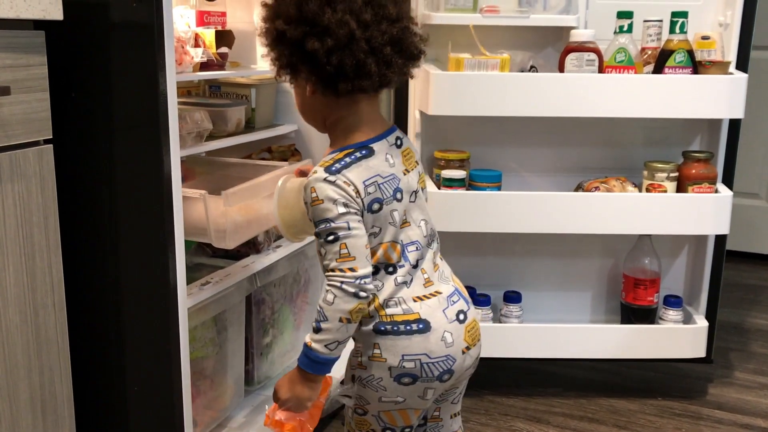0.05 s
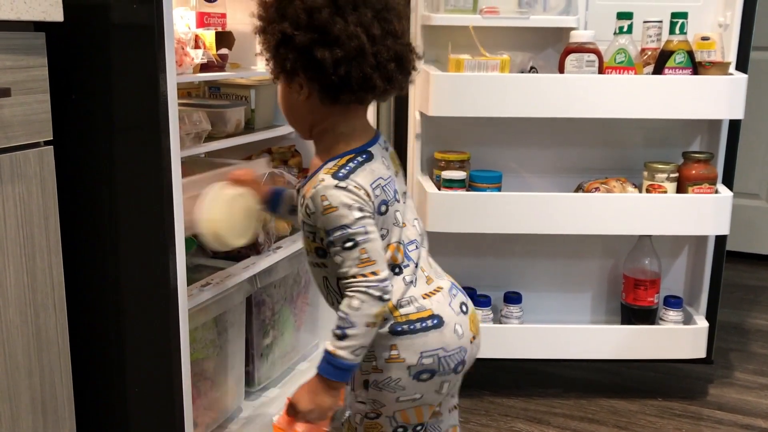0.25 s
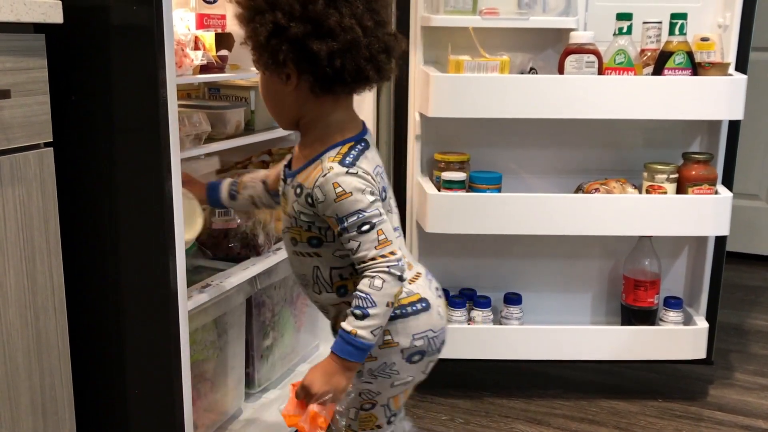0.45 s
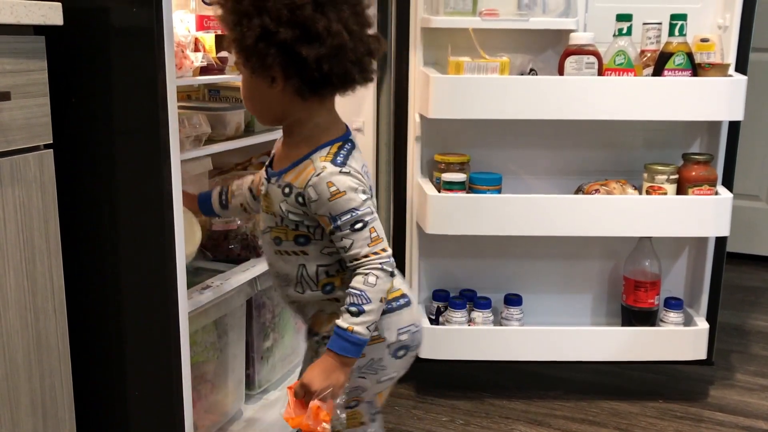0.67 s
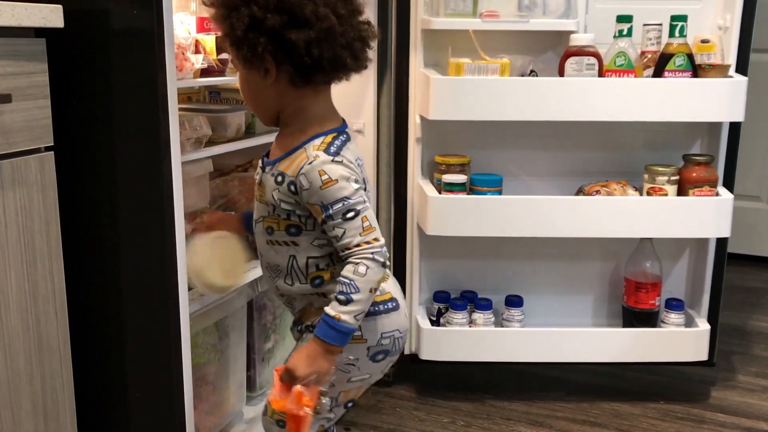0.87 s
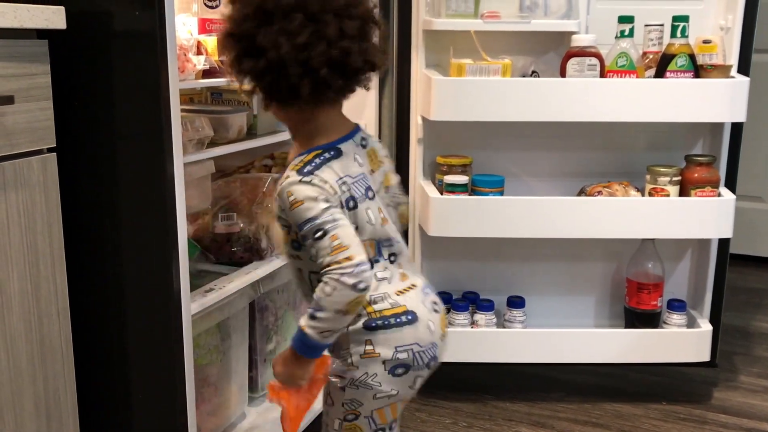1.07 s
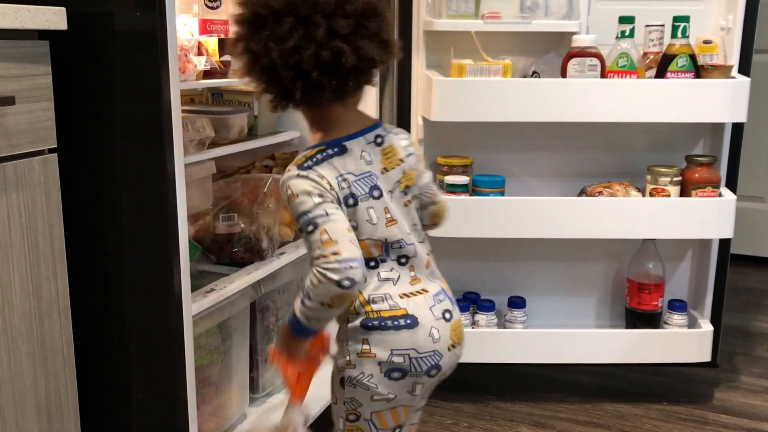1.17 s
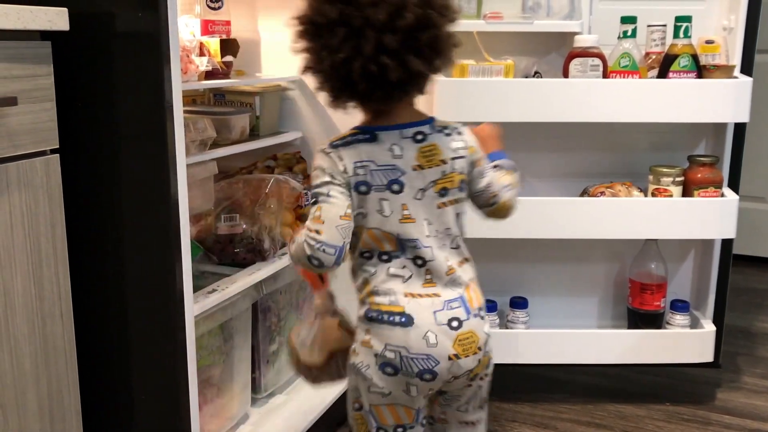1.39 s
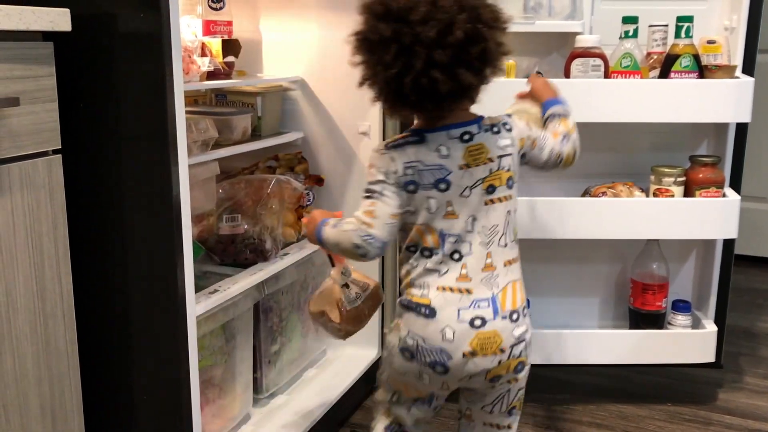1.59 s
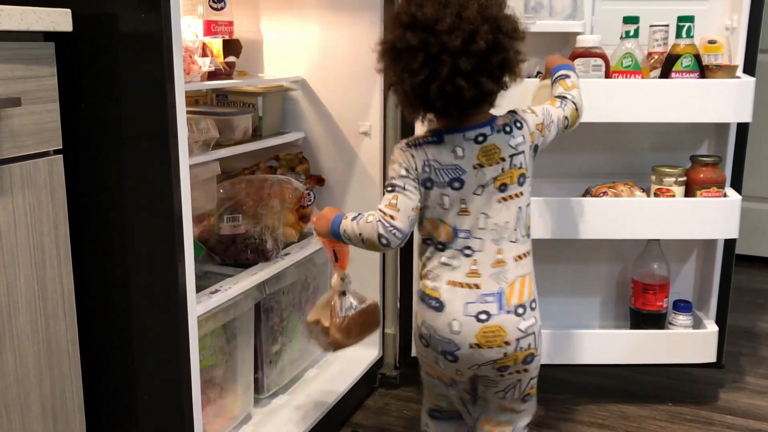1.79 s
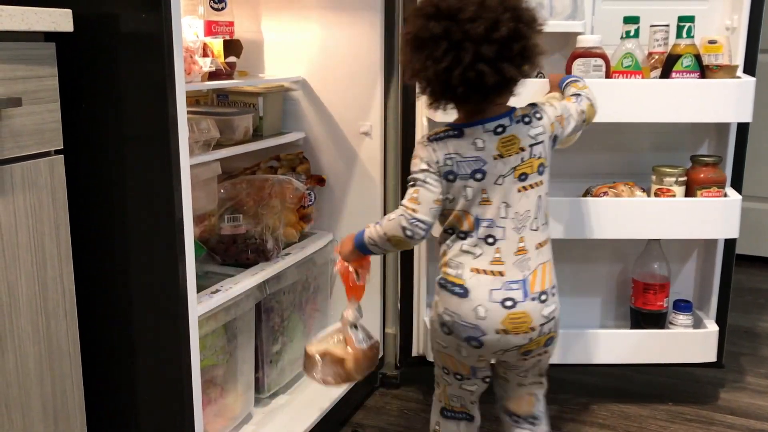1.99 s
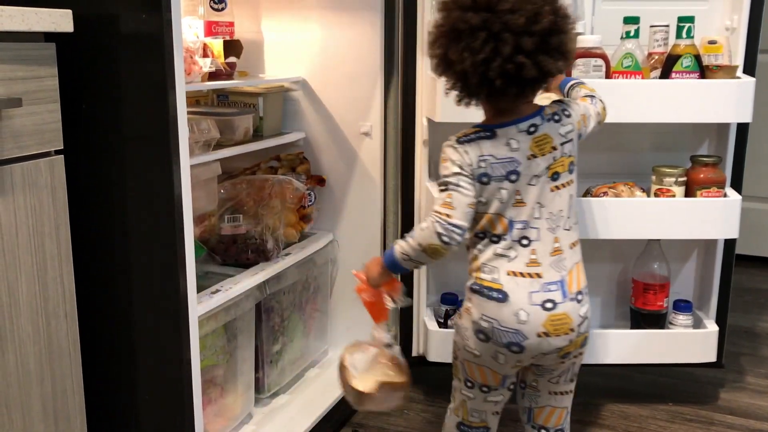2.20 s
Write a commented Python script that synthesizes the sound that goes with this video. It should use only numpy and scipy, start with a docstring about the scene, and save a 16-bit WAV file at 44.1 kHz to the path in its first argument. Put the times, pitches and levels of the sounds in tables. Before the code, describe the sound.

A food container clatters into a plastic fridge drawer, rolls bumpily and thuds at the end; then faint bag crinkles and tiny clinks, and a light knock on the door shelf, heard close in a kitchen.

```python
"""A round food container drops into a plastic refrigerator drawer, rolls along it and thuds to a stop.
Blows ring modes and decaying noise; rolling is a patter of short pings, brushing wrap a run of clicks.
Jars, bottles and packets clink as sines; a thin bag crinkles in pings and noise snaps, with a high hiss.
Then something knocks on a door shelf. The refrigerator hums in faint air noise; the kitchen reverberates."""
import sys
import numpy as np
from scipy import signal
from scipy.fft import rfft, irfft
from scipy.io import wavfile

SR = 44100
rng = np.random.default_rng(int(sys.argv[2]) if len(sys.argv) > 2 else 0)


def digitize_waveform(pressure):
    """Quantize a signal to 16-bit integers and store it at the path in sys.argv[1].

    Rows of a 2-D input are taken as channels; values are limited to [-1, 1].
    """
    field = np.atleast_2d(pressure).T
    bounded = np.clip(field, -1, 1)
    quanta = np.round(bounded * 32767).astype(np.int16)
    wavfile.write(sys.argv[1], SR, quanta)


N = 99225  # samples


def amp(db):
    """Converts decibels to gain."""
    return 10 ** (np.asarray(db) / 20)


def unit(x):
    """Scales to an rms of one."""
    return x / np.sqrt(np.mean(x ** 2) + 1e-20)


def read(points, hz):
    """Interpolates a table on a log-frequency axis."""
    f, value = np.transpose(points)
    return np.interp(np.log(hz + 1), np.log(f + 1), value)


def level(points):
    """Gain over time from a table of seconds and dB."""
    return amp(np.interp(np.arange(N) / SR, *np.transpose(points)))


def freqs(size):
    """Bin frequencies of a spectrum in Hz."""
    return np.fft.rfftfreq(size, 1 / SR)


def colour(x, points):
    """Filters a signal by a dB curve, to an rms of one."""
    gain = amp(read(points, freqs(len(x))))
    return unit(irfft(rfft(x) * gain, len(x)))


def add(mix, s, sound):
    """Mixes a sound in at s seconds."""
    part = mix[max(round(s * SR), 0):][:len(sound)]
    part += sound[:len(part)]


def taps(size, order=12):
    """One impulse of random sign at a random place in every short step."""
    out = np.zeros(size)
    at = np.arange(0, size - order, order)
    out[at + rng.integers(0, order, len(at))] = rng.choice([-1., 1.], len(at))
    return out


def die_away(x, t60s, count=11):
    """Splits a signal into overlapping bands, each decaying at its own speed."""
    t, hz, centres = np.arange(len(x)) / SR, freqs(len(x)), np.geomspace(70, 15000, count)
    z = rfft(x)
    out = np.zeros(len(x))
    for centre_hz, weights in zip(centres, np.eye(count)):
        band = irfft(z * read(np.c_[centres, weights], hz), len(x))
        out += band * amp(-60 * t / read(t60s, centre_hz))
    return out


def ring(modes, size=32768):
    """Exponentially decaying sines of a struck object, alternating in sign."""
    t = np.arange(size) / SR
    out = np.zeros(size)
    for k, (hz, db, t60) in enumerate(modes):
        decay = np.exp(-np.log(1000) * t / t60)
        out += (-1) ** k * amp(db) * decay * np.sin(2 * np.pi * hz * t)
    return out


def grains(per_s, spread_db):
    """Clicks at random times and of random sign, a few of them large."""
    hits = rng.random(N) < per_s / SR
    sizes = amp(spread_db * np.minimum(rng.exponential(1, N), 4))
    return hits * rng.choice([-1., 1.], N) * sizes


def patter(per_s, spread_db, cycles, range_hz, count=28, size=4096):
    """Many tiny contacts, each a ping at one of count pitches, falling to 1/e in the given cycles."""
    out, t = np.zeros(N), np.arange(size) / SR
    for hz in np.geomspace(*range_hz, count):
        ping = hz * np.exp(-hz * t / cycles) * np.sin(2 * np.pi * hz * t)
        out += signal.oaconvolve(grains(per_s / count, spread_db), ping)[:N]
    return out


# Decay of plastic panels. Each row: frequency in Hz, t60 in s.
PANEL_T60 = [(100, 0.2), (400, 0.14), (1200, 0.15), (4000, 0.17), (14000, 0.063)]
BASS_HZ, TREBLE_HZ = 300, 4400  # corners of the tilt shelves
MODE_SCATTER = 0.016  # relative pitch change from one contact point to the next


def blows(rows, spectrum, modes, size=32768):
    """Each blow sets off an object's main modes and the dense clatter of its panels."""
    out, t, hz = np.zeros(N), np.arange(size) / SR, freqs(size)
    bass = 1 / (1 + (hz / BASS_HZ) ** 2)
    treble = hz ** 2 / (hz ** 2 + TREBLE_HZ ** 2)
    for s, db, bass_db, treble_db, rise_s, modes_db in rows:
        tilt = amp(bass_db * bass + treble_db * treble)
        clatter = die_away(irfft(rfft(colour(taps(size), spectrum)) * tilt), PANEL_T60)
        struck = [(f * (1 + MODE_SCATTER * rng.uniform(-0.98, 1)), mode_db, t60) for f, mode_db, t60 in modes]
        onset = np.minimum(t / rise_s, 1)
        add(out, s, onset * (amp(db) * clatter + amp(modes_db) * ring(struck)))
    return out


# Hum lines. Each row: frequency in Hz, level in dB before BACKGROUND, unsteadiness 0-1.
HUM = [(173, -56, 0.23), (251, -64, 0.55), (356, -71.5, 0.24)]
# Spectrum of the air noise. Each row: frequency in Hz, relative level in dB per Hz.
AIR_COLOUR = [(25, -34), (55, -17), (100, -0.5), (200, 5.5), (400, -5.5), (700, -9.5), (1300, -10.5),
              (2000, -18), (4200, -21), (7000, -33), (10000, -38), (16000, -66)]
# Gain on hum and air. Each row: time in s, gain in dB.
BACKGROUND = [(0, -6), (.9, 4.5), (1.3, 2.5), (1.7, 1.5)]
HUM_WAVER_HZ, AIR_DB = 7, -57  # AIR_DB before BACKGROUND


def refrigerator():
    """Hum lines, wavering by slow noise in two quadratures, in soft air noise."""
    t = np.arange(N) / SR
    out = amp(AIR_DB) * colour(rng.standard_normal(N), AIR_COLOUR)
    slow = np.exp(-(freqs(N) / HUM_WAVER_HZ) ** 2)
    for hz, db, unsteady in HUM:
        a, b = unit(irfft(rfft(rng.standard_normal((2, N))) * slow, N))
        in_phase = (1 - unsteady + unsteady * a) * np.sin(2 * np.pi * hz * t)
        quadrature = unsteady * b * np.cos(2 * np.pi * hz * t)
        out += amp(db) * unit(in_phase + quadrature)
    return out * level(BACKGROUND)


# Rolling and sliding. Each row: time in s, level in dB.
ROLL = [(.14, -100), (.16, -53), (.225, -42), (.265, -31.5), (.35, -26), (.4, -28), (.48, -28.5),
        (.54, -33.5), (.6, -32), (.66, -29), (.77, -40.5), (.85, -64)]
# Spectrum of the roll. Each row: frequency in Hz, relative level in dB per Hz.
ROLL_COLOUR = [(35, -65), (80, -48), (170, -3), (260, -8.5), (370, -2), (520, -4.5), (680, 0), (1000, -5.5),
               (1400, -6.5), (1900, -13), (3500, -15), (6000, -29), (16000, -47)]


def container_roll():
    """Rolling and sliding contact as a dense patter of short pings."""
    contacts = patter(per_s=2600, spread_db=3, cycles=5.3, range_hz=(279, 7490))
    return level(ROLL) * colour(contacts, ROLL_COLOUR)


# First light touch. Each row: mode frequency in Hz, relative level in dB, t60 in s.
TOUCH_MODES = [(341, -1, 0.12), (417, -1.5, 0.15), (652, -10, 0.13), (1603, 3.5, 0.1), (1708, 3, 0.058),
               (2930, -11, 0.033)]
TOUCH_S, TOUCH_DB = .148, -40


def drawer_touch():
    """A first light touch on the drawer rings a few modes."""
    out = np.zeros(N)
    add(out, TOUCH_S, amp(TOUCH_DB) * ring(TOUCH_MODES))
    return out


# Wrapping on the drawer. Each row: time in s, level in dB.
BRUSH = [(.15, -100), (.19, -46), (.22, -47), (.26, -41.5), (.33, -40.5), (.41, -39.5), (.48, -47),
         (.62, -74)]
# Spectrum of the brushing. Each row: frequency in Hz, relative level in dB per Hz.
BRUSH_COLOUR = [(800, 6), (2500, -4), (5000, -0.5), (8000, 3.5), (10500, -4), (16000, -5)]


def wrap_brush():
    """Wrapping brushes along the drawer as filtered random clicks."""
    return level(BRUSH) * colour(grains(per_s=11000, spread_db=3.0), BRUSH_COLOUR)


# Container striking the drawer. Each row: start in s, clatter level in dB before tilt and decay,
# bass tilt in dB, treble tilt in dB, rise in s, mode level in dB.
DROPS = [(.153, -38, 14, -45, 0.0069, -51), (.228, -24, -31, 12.5, 0.00045, -19),
         (.246, -15, -2, 7.5, 0.0025, -35), (.251, -21.5, 5, -14, 0.0018, -21),
         (.2555, -17.5, -3, -27, 0.00067, -16.5), (.36, -25, 5, 22, 0.0037, -29),
         (.38, -37, 6, 4, 0.01, -21), (.402, -26.5, 22, 1, 0.0048, -36), (.468, -27, -20, 5, 0.0024, -28)]
# Panel spectrum. Each row: frequency in Hz, relative level in dB per Hz.
TUB_COLOUR = [(35, -69), (60, -30.5), (189, -42), (256, -18), (398, 0.5), (503, -15.5), (924, 3),
              (1040, -4.5), (1170, -7), (1550, -11), (3500, -17.5), (16000, -44)]
# Container modes. Each row: frequency in Hz before scatter, relative level in dB, t60 in s.
TUB_MODES = [(390.1, -13, 0.2), (415.4, -14, 0.2), (683, -9.5, 0.13), (924, 0, 0.12), (1171, -11, 0.49),
             (1363, -15, 0.14), (1803, -14.5, 0.28), (2660, -27, 0.088), (3480, -22, 0.25)]


def container_drop():
    """Impacts on the drawer ring the container's modes and panels."""
    return blows(DROPS, TUB_COLOUR, TUB_MODES)


# Container thudding over the drawer floor, hitting its end and rocking. Columns as in DROPS.
THUDS = [(.376, -26, 8.5, 17, 0.0035, -23.5), (.604, -17.5, 5, 7.5, 0.0055, -41),
         (.614, -14, -5.5, -2, 0.0037, -11), (.639, -23, 10.5, 7.5, 0.0027, -14),
         (.662, -29, -11, 4.5, 0.0033, -31), (.676, -38, -4, 8, 0.004, -22.5),
         (.696, -32, -5, 1, 0.0068, -18), (.708, -33, -1, -6, 0.0023, -18.5),
         (.745, -39, -13, -14, 0.0047, -25.5)]
# Panel spectrum. Each row: frequency in Hz, relative level in dB per Hz.
DRAWER_COLOUR = [(40, -33), (90, -10), (140, -17.5), (225, -4.5), (330, -12.5), (480, -20), (680, -9.5),
                 (1200, -14.5), (2400, -21), (7700, -35), (16000, -47.5)]
# Drawer modes. Each row: frequency in Hz before scatter, relative level in dB, t60 in s.
DRAWER_MODES = [(209.8, -2, 0.12), (250, -4.5, 0.11), (295, -17.5, 0.26), (457, -10.5, 0.21),
                (843, -16.5, 0.19), (1128, -9, 0.099), (1267, -13, 0.15)]


def drawer_thuds():
    """Impacts of the container ring the drawer's modes and panels."""
    return blows(THUDS, DRAWER_COLOUR, DRAWER_MODES)


# Rim bumps. Each row: start in s, level in dB, frequency in Hz.
BUMPS = [(.402, -16.5, 694), (.432, -19.5, 1036), (0.467, -27, 1390), (.479, -25.5, 307),
         (.495, -22.5, 685), (.518, -18.5, 269), (.545, -22, 332), (0.575, -24, 327)]
BUMP_RISE_S, BUMP_T60_S = 0.0036, 0.062


def rim_bumps(size=8192):
    """The rolling container's rim bumps, each a soft-edged decaying sine at its own pitch."""
    out = np.zeros(N)
    onset = np.minimum(np.arange(size) / SR / BUMP_RISE_S, 1)
    for s, db, hz in BUMPS:
        add(out, s, onset * ring([(hz, db, BUMP_T60_S)], size))
    return out


# Clinks of jars, bottles and packets, and at 1.937 s the sharp first contact of the door-shelf knock. Each row:
# start in s, level in dB, frequency in Hz, t60 in s.
CLINKS = [(0.721, -35.5, 1443, 0.23), (.83, -39.5, 1428, .15), (0.967, -45, 1330, 0.15),
          (1.2222, -42.5, 2800, 0.021), (1.2224, -47.5, 3720, 0.032), (1.285, -42, 6020, 0.036),
          (1.2941, -39.5, 2690, 0.03), (1.2935, -53.5, 5330, 0.089), (1.314, -51, 2720, 0.046),
          (1.5656, -41.5, 5100, 0.02), (1.592, -53, 2443, 0.2), (1.937, -20, 2230, .002),
          (2.056, -34, 1030, 0.041), (2.108, -45, 1430, .1), (2.152, -44.5, 1413, 0.078),
          (2.183, -48, 1483, 0.051)]
CLINK_SPLIT, CLINK_PARTNER_DB = 0.0925, -7  # second mode: relative distance, relative level


def clinks():
    """Light contacts ring a pair of close modes."""
    out = np.zeros(N)
    for s, db, hz, t60 in CLINKS:
        partner = (hz * (1 + CLINK_SPLIT), db + CLINK_PARTNER_DB, t60)
        add(out, s, ring([(hz, db, t60), partner]))
    return out


# Crinkling of the bag. Each row: time in s, level in dB.
CRINKLE = [(.8, -100), (.855, -64), (.89, -68.5), (.95, -96), (1.02, -74), (1.06, -53), (1.13, -77),
           (1.18, -61.5), (1.23, -64), (1.27, -73), (1.3, -52), (1.37, -64), (1.41, -75), (1.53, -74),
           (1.69, -69), (1.78, -83), (1.812, -56), (1.87, -81), (2.1, -65.5), (2.15, -100)]
# Spectrum of the crinkle. Each row: frequency in Hz, relative level in dB per Hz.
CRINKLE_COLOUR = [(500, -19), (1500, 2), (2800, 0), (4500, -1), (7000, 1.5), (10000, -2.5), (15000, 1),
                  (16500, -18)]


def bag_crinkle():
    """Fine buckling of thin plastic as a patter of high, short pings."""
    buckles = patter(per_s=9200, spread_db=4.5, cycles=2.8, range_hz=(2210, 15300))
    return level(CRINKLE) * colour(buckles, CRINKLE_COLOUR)


# Sharp snaps of plastic. Each row: start in s, level in dB before decay, centre in Hz.
SNAPS = [(0.883, -56, 12600), (1.032, -58, 12000), (1.047, -49, 6440), (1.053, -51, 6340),
         (1.063, -49, 8100), (1.076, -52, 8000), (1.098, -53, 11200), (1.222, -41, 10900),
         (1.344, -46.5, 6150), (1.348, -46, 11500), (1.364, -44, 11300), (1.7183, -49.5, 13400),
         (1.8255, -41, 9730), (1.828, -46, 6600)]
SNAP_DECAY_S, SNAP_OCTAVES, SNAP_SLOPE = 0.0036, 0.41, 0.98  # time to 1/e, half-width, skirt exponent


def bag_snaps(size=2048):
    """Single buckles of plastic as decaying band-shaped noise."""
    out, t, hz = np.zeros(N), np.arange(size) / SR, freqs(size)
    for s, db, centre_hz in SNAPS:
        octaves = np.log2((hz + 1) / centre_hz)
        shape = (1 + (octaves / SNAP_OCTAVES) ** 2) ** -SNAP_SLOPE
        burst = unit(irfft(rfft(taps(size, order=4)) * shape))
        add(out, s, amp(db) * np.exp(-t / SNAP_DECAY_S) * burst)
    return out


# Thin hiss around the shelf knocks. Each row: time in s, level in dB.
HISS = [(1.8, -100), (1.87, -55), (1.96, -55.5), (2.04, -48.5), (2.09, -76), (2.13, -100)]
# Spectrum of the hiss. Each row: frequency in Hz, relative level in dB per Hz.
HISS_COLOUR = [(8000, -48), (11500, -22), (12800, -7), (15200, -12), (16200, -8.5)]


def high_hiss():
    """Thin high hiss as filtered noise."""
    return level(HISS) * colour(rng.standard_normal(N), HISS_COLOUR)


# Knocks on the door shelf. Columns as in DROPS.
KNOCKS = [(1.946, -24.5, -22, 4.5, 0.0065, -35), (1.961, -26.5, -4, 1.5, 0.0015, -30),
          (1.976, -29, 10.5, -3, 0.002, -29), (1.998, -31, 17, 0.5, 0.0037, -33.5),
          (2.018, -36.5, -8, 7, 0.0014, -35), (2.056, -36, -5, -9, 0.00097, -51)]
# Panel spectrum. Each row: frequency in Hz, relative level in dB per Hz.
SHELF_COLOUR = [(47, -59), (80, -38), (144, -26.5), (340, -9), (517, -7.5), (708, -6), (970, -8.5),
                (3950, -27.5), (5760, -38), (12000, -44.5), (15600, -77)]
# Shelf modes. Each row: frequency in Hz before scatter, relative level in dB, t60 in s.
SHELF_MODES = [(340, 3, 0.11), (459.5, -11.5, 0.23), (634, -8, 0.11), (689, -1, 0.21), (1041, -11.5, 0.25),
               (1360, -9.5, 0.23), (2170, -26, 0.13)]


def shelf_knocks():
    """Knocks ring the door shelf's modes and panels."""
    return blows(KNOCKS, SHELF_COLOUR, SHELF_MODES)


# Room decay. Each row: frequency in Hz, t60 in s.
ROOM_T60 = [(100, 0.31), (300, 0.43), (1300, 0.58), (3500, 0.48), (8000, 0.32), (12000, 0.19)]
ROOM_DELAY_S = .006


def kitchen(x):
    """Short reverberation of a hard-walled room: random reflections decaying by band."""
    tail = die_away(taps(size=32768), ROOM_T60)
    out = np.zeros(N)
    add(out, ROOM_DELAY_S, signal.fftconvolve(x, tail / np.linalg.norm(tail)))
    return out


ROOM_DB, BAG_ROOM_DB = -9.5, -12  # reverberation sends


def scene():
    """Sums all sources and the room in one channel."""
    hum = refrigerator()
    knocks = container_roll() + drawer_touch() + wrap_brush() + container_drop()
    knocks += drawer_thuds() + rim_bumps() + shelf_knocks()
    rustle = clinks() + bag_crinkle() + bag_snaps() + high_hiss()
    room = kitchen(amp(ROOM_DB) * knocks + amp(BAG_ROOM_DB) * rustle)
    return (knocks + rustle + room + hum)[None]


LOW_CUT_HZ, EDGE_HZ = 65, 16100


def record(dry):
    """The microphone's bass roll-off and the recorder's band limit."""
    high_pass = signal.butter(4, LOW_CUT_HZ, "highpass", fs=SR, output="sos")
    thin = signal.sosfilt(high_pass, dry)
    low_pass = signal.firwin(511, EDGE_HZ, window=("kaiser", 9), fs=SR)
    return signal.oaconvolve(thin, low_pass[None], "same")


dry = scene()
out = record(dry)
digitize_waveform(out)
```